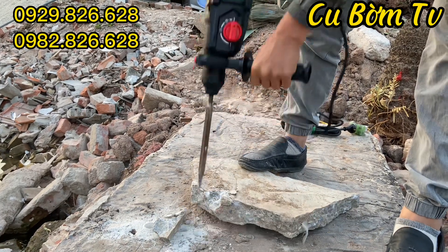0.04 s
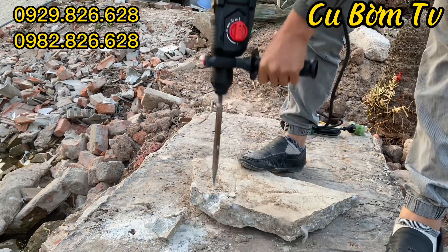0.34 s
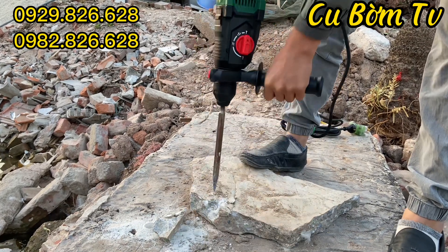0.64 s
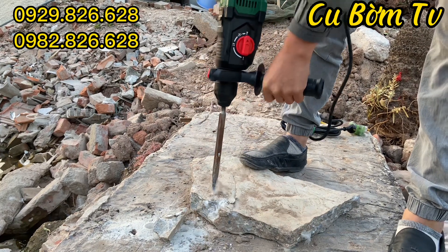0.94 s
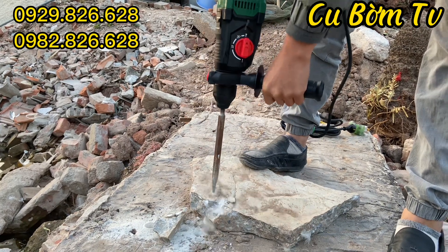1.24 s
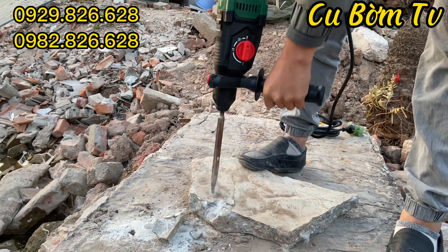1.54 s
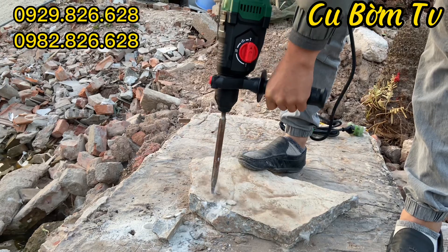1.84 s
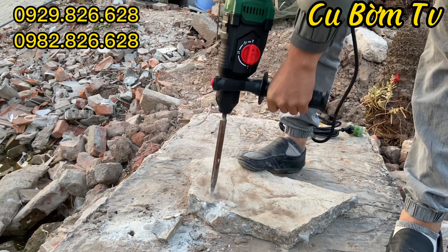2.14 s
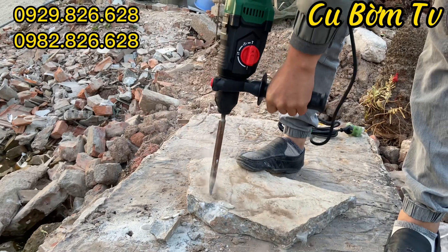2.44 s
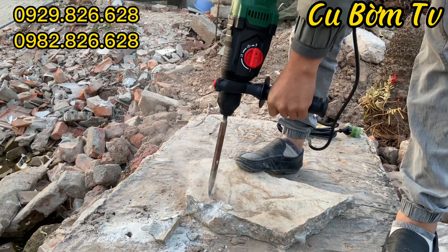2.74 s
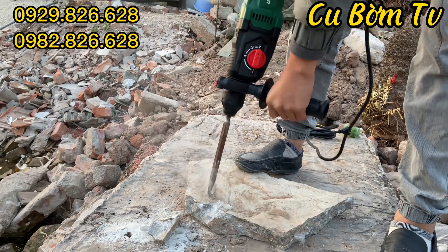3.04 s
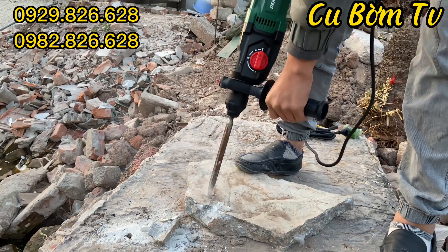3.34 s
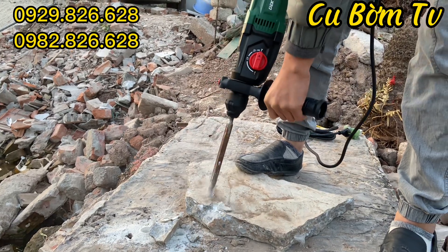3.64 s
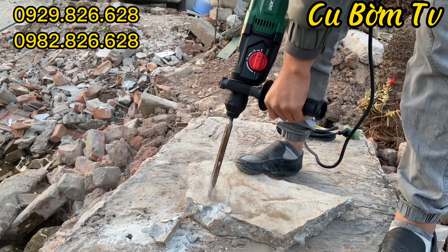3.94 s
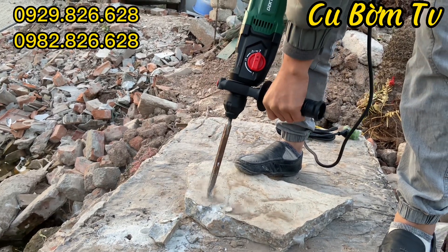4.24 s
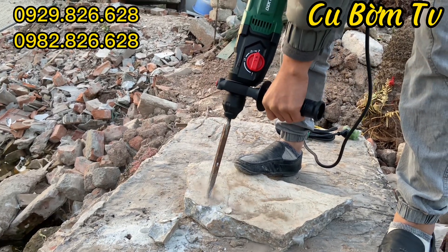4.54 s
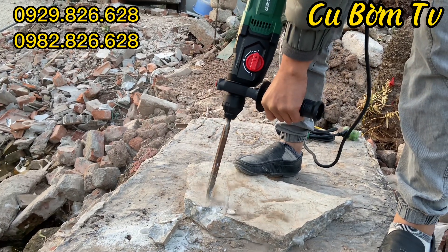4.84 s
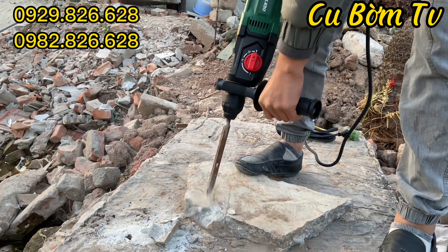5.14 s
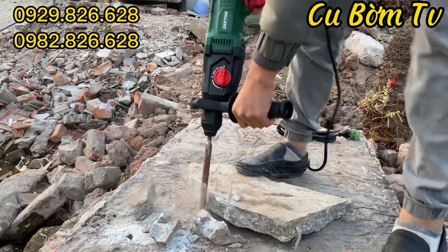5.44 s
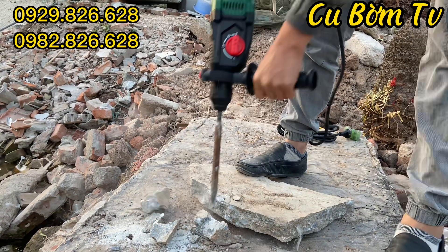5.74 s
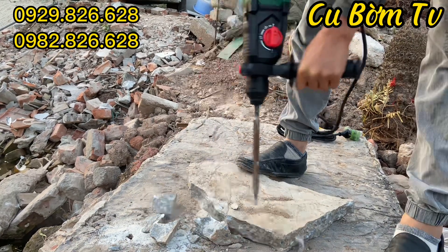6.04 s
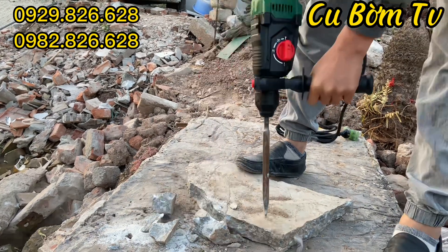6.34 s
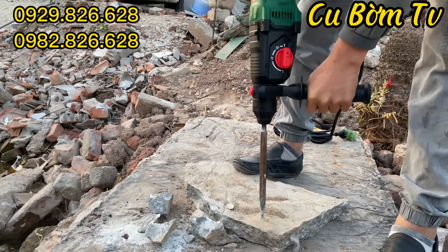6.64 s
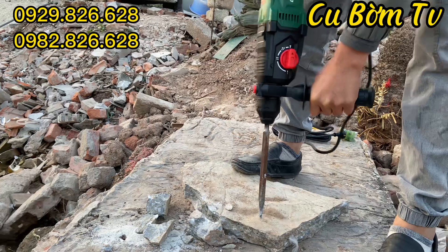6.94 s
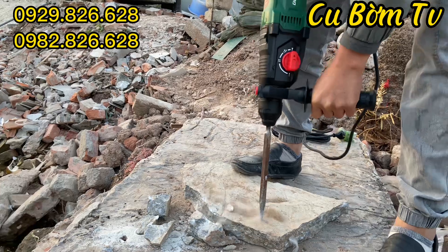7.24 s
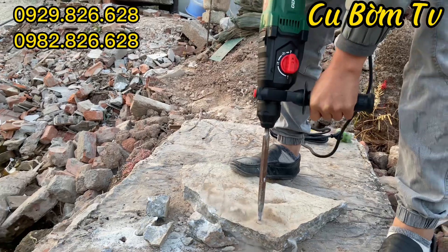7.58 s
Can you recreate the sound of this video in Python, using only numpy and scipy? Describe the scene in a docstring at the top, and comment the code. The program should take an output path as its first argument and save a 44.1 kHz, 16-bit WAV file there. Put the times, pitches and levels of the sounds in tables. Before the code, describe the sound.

Outdoors, about a metre away, an electric hammer coasts with a few light clinks, then revs up and chisels a concrete slab in a fast, buzzing rattle with steel pings, crunching grit and motor whine. After a long burst the edge breaks off, the bit chatters loose and chunks knock down. The motor slows while the slab grinds faintly, then a second burst builds. Surrounding rubble gives a short echo.

```python
"""An electric hammer chisels a concrete slab outdoors, about a metre away: a long burst until the edge
breaks off and the bit rattles loose, then a second burst. Each piston blow is an impulse that rings the
steel at once, thumps the slab a moment later and crushes grit. The motor adds fan noise and whine in
step with its speed. Between bursts it coasts down, the freed slab rocks and the slowing piston ticks.
The slab reflects the sound and the surrounding stones scatter a short echo."""
import sys
import numpy as np
from scipy import signal
from scipy.fft import rfft, irfft, next_fast_len
from scipy.io import wavfile
from scipy.ndimage import uniform_filter1d

SR = 44100
rng = np.random.default_rng(int(sys.argv[2]) if len(sys.argv) > 2 else 0)


def dump_mix(stems):
    """Bounce the given channels to the path in sys.argv[1] as a 16-bit WAV at rate SR."""
    frames = np.atleast_2d(stems).T  # one column per channel
    limited = np.clip(frames, -1, 1)  # hard clip at full scale
    pcm = np.round(limited * 32767).astype(np.int16)
    wavfile.write(sys.argv[1], SR, pcm)


N = 344421
BLOW_SIZE = 4096  # samples in one short sound
TIME, BLOW_TIME = np.arange(N) / SR, np.arange(BLOW_SIZE) / SR
PADDED_SIZE = 2 * next_fast_len(N // 2 + BLOW_SIZE)
ALL_HZ = np.fft.rfftfreq(PADDED_SIZE, 1 / SR) + 1
BLOW_HZ = np.fft.rfftfreq(BLOW_SIZE, 1 / SR) + 1
SIDES = np.array([[1], [-1]])  # opposite signs for left and right
FULL_RATE = 70.5  # piston strokes per second
BREAK_S = 5.16  # the edge breaks off
TOP_HZ = 15850

# Spans in which the striker works. Each row: start and end in seconds.
BURSTS = [(.691, 5.575), (6.639, 7.81)]
# Where the tip sits. Each row: time in seconds, seat (0 edge, 1 deep in its pit, 2 loose, 3 flat face).
SEAT = [(2.9, 0), (3.35, 1), (5.15, 1), (5.2, 2), (5.6, 2), (5.9, 3)]
# Modes of bit, housing and slab with the tip on the face. Each row: centre and width in Hz, level in dB.
ON_FACE = [(153.6, 58, -11.5), (347, 76, 0.5), (483, 52, 0), (637, 132, 3), (895, 154, -6), (1484, 166, -5),
           (1570, 70, -7), (2060, 720, -15), (2370, 200, -9), (2827, 88, -4.5), (3140, 370, -9),
           (3780, 210, -22), (4300, 1300, -22), (6360, 1900, -31.5), (7830, 430, -26)]


def undb(db):
    """Decibels to amplitude gain."""
    return 10 ** (np.asarray(db) / 20)


def curve(table, at, column=1):
    """Linear interpolation of one column of a table."""
    table = np.asarray(table, float)
    return np.interp(at, table[:, 0], table[:, column])


def unit(x):
    """Normalisation to rms 1."""
    return x / np.sqrt(np.mean(x ** 2))


def colour(points, hz):
    """Gain of a spectral envelope given as (Hz, dB) points."""
    f, db = np.transpose(points)
    return undb(np.interp(np.log(hz), np.log(f), db))


def resonances(modes, hz):
    """Gain of steep-sided resonances whose powers add."""
    return np.sqrt(sum(undb(db) ** 2 / (1 + ((hz ** 2 - f ** 2) / (hz * width)) ** 2) ** 2
                       for f, width, db in modes))


def filtered(x, gain):
    """Linear filtering: the signal's spectrum times a frequency response."""
    return irfft(rfft(x, PADDED_SIZE) * gain)[..., :N]


def noise(gain):
    """White noise shaped by a frequency response, at rms 1."""
    return unit(filtered(rng.standard_normal(N), gain))


def drift(corner_hz):
    """Low-pass noise: a smooth random fluctuation of rms 1."""
    return noise(1 / (1 + (ALL_HZ / corner_hz) ** 4))


def causal(gain):
    """Minimum phase: the response with this gain that rings only after it is struck."""
    cepstrum = irfft(np.log(gain + 1e-4))
    cepstrum[..., 1:BLOW_SIZE // 2] *= 2
    cepstrum[..., BLOW_SIZE // 2 + 1:] = 0
    return np.exp(rfft(cepstrum))


def crackle(count, decay_s, spiky_db, rise_s=0.00012):
    """Granular noise: uneven bursts that swell and decay, one a row, each of energy 1."""
    shape = (count, BLOW_SIZE)
    envelope = (1 - np.exp(-BLOW_TIME / rise_s)) * np.exp(-BLOW_TIME / decay_s)
    grains = rng.standard_normal(shape) * undb(spiky_db * rng.standard_normal(shape)) * envelope
    return grains / np.linalg.norm(grains, axis=1, keepdims=True)


def at_level(sounds, db, stroke_s=.014):
    """Equivalent level: each row gets the energy of its rms level held for one stroke."""
    sounds = sounds / np.linalg.norm(sounds, axis=1, keepdims=True)
    return sounds * np.sqrt(stroke_s * SR) * undb(db)[:, None]


def place(times, sounds):
    """Superposition of short sounds, each from its own start time."""
    out = np.zeros(N + 2 * BLOW_SIZE)
    for t, sound in zip(times, sounds):
        start = int(t * SR)
        out[start:start + BLOW_SIZE] += sound
    return out[:N]


def stroke_rate(opening_rate=49.3, settle_s=.125, coast_loss_per_s=36.5):
    """Inertia: under power the stroke rate relaxes towards a goal; unpowered, friction slows it evenly."""
    # Changes of trigger or load. Each row: time in seconds, goal in strokes per second (0 is off).
    drive = [(0, 0), (.691, 23.6), (.789, 70.06), (1.85, 70.35), (3.0, 70.65), (5.17, 75.5), (5.35, 61.5),
             (5.48, 44.5), (5.66, 0), (6.639, 10.36), (6.72, 26.82), (6.81, 42.72), (6.9, 50.57),
             (7.07, 69.38), (7.3, 69.89)]
    rate = np.full(N, opening_rate)
    for start, goal in drive:
        after = TIME >= start
        now, since = rate[after][0], TIME[after] - start
        if goal:
            rate[after] = goal + (now - goal) * np.exp(-since / settle_s)
        else:
            rate[after] = now - coast_loss_per_s * since
    return rate


def motor(rate, air_db=-36, whine_db=-43.5, turns_per_stroke=5.55, shudder=.016, throb=0.59):
    """Turbulent fan air and shaft harmonics grow with speed, amplitude-modulated by the piston."""
    # Armature slots, fan and commutator. Each row: multiple of the shaft speed, level in dB.
    harmonics = [(6, 3), (12, 1), (18, -1), (21, -2.5), (24, -2), (48, -5.5), (72, 0)]
    # Spectrum of the cooling air, and the gear case's response. Each row: frequency in Hz, gain in dB.
    vents = [(60, -53), (250, -20), (550, -5.5), (950, 8.5), (1350, 3.5), (1950, 15), (2300, 7.5),
             (2700, 7), (4000, -4), (6500, -8.5), (11000, -5), (16000, -12)]
    gear_case = [(600, -16), (950, -5), (1400, -19), (1700, -4), (2050, 5.5), (2400, -1.5), (2800, -5),
                 (3500, -8), (4400, -13.5), (6500, -11), (11000, -12)]
    speed = rate / FULL_RATE
    shaft_hz = turns_per_stroke * rate
    shaft_angle = 2 * np.pi * np.cumsum(shaft_hz * (1 + shudder * drift(201.6))) / SR
    whine = sum(undb(db) * np.sin(order * shaft_angle) * (order * shaft_hz < TOP_HZ)
                for order, db in harmonics)
    whine *= undb(2.5 * drift(34))
    # the throb is in phase with the first blow of each burst
    strokes = np.cumsum(rate) / SR
    first_blow = np.where(TIME < BURSTS[0][1], BURSTS[0][0], BURSTS[1][0])
    strokes -= np.interp(first_blow, TIME, strokes)
    piston = .55 + throb * np.cos(np.pi * strokes) ** 6
    air = noise(colour(vents, ALL_HZ)) * piston * undb(0.3 * drift(67))
    whine = unit(filtered(whine * np.sqrt(piston), colour(gear_case, ALL_HZ)))
    return undb(air_db) * air * speed ** 1.28 + undb(whine_db) * whine * speed


def open_air(level_db=-58):
    """Ambient noise, partly coherent between left and right."""
    # The outdoor background. Each row: frequency in Hz, level in dB.
    spectrum = [(25, -64), (70, 5), (200, 3.5), (1000, -3), (4000, -3), (16000, -20)]
    white = rng.standard_normal(N) + .5 * rng.standard_normal((2, N))
    return undb(level_db) * unit(filtered(white, colour(spectrum, ALL_HZ)))


def clinks_and_ticks(scrape=0.54):
    """Damped free vibration: loose pieces clink and the slowing piston ticks, each a ring and a scrape."""
    # Each row: start in seconds, level in dB, ring frequency in Hz, time to decay 60 dB in seconds.
    contacts = [(0.3903, -25, 1616, 0.072), (0.398, -24, 1586, 0.073), (0.419, -24.5, 1574, 0.05),
                (0.628, -29.5, 2130, 0.022), (.665, -43.5, 3330, 0.013), (6.493, -29, 3000, 0.0035),
                (6.543, -23.5, 2460, 0.0031), (6.599, -27, 2220, 0.0036), (6.758, -32, 2200, 0.0084),
                (6.816, -33, 2230, 0.017)]
    times, db, hz, t60 = np.transpose(contacts)[:, :, None]
    ring = np.sin(2 * np.pi * hz * BLOW_TIME) * np.exp(-np.log(1000) * BLOW_TIME / t60)
    return place(times[:, 0], undb(db) * (ring + scrape * crackle(len(times), decay_s=.003, spiky_db=2)))


def strike(body, rough_hz, on_face, uneven=0.17, rebound_s=0.001281, rebound_share=0.29):
    """Impulse response of each row of body: a clean push below rough_hz, crush and rattle above it."""
    # Steel sounds first, slab later. Each row: frequency in Hz, delay in seconds at edge and on face.
    arrival = [(250, 0.00467, 0.00504), (473, 0.005, 0.0052), (658, .0012, 0.0032), (1080, 0.00087, 0.0022),
               (1620, 0.0012, .0012), (2330, 0.0011, 0.00037), (4240, 0.000865, 0.00036),
               (7070, 0.00017, .0002)]
    crush = crackle(len(body), decay_s=0.0054, spiky_db=1.5, rise_s=0.063)
    rattle = crackle(len(body), decay_s=0.049, spiky_db=4.0)
    # the slab never answers twice alike, so even its low notes are a little uneven
    roughness = BLOW_HZ / rough_hz[:, None] + uneven / (1 + (220 / BLOW_HZ) ** 4)
    push = (1 + roughness * rfft(crush + rattle) / np.sqrt(2)) / np.hypot(1, roughness)
    # the steel rebounds in its holder: a second, inverted pulse in the treble
    second = rebound_share / np.hypot(1, (2970 / BLOW_HZ) ** 4)
    rebound = (second * np.exp(-2j * np.pi * BLOW_HZ * rebound_s) - 1) / np.hypot(1, second)
    group_delay = (np.outer(1 - on_face, curve(arrival, BLOW_HZ))
                   + np.outer(on_face, curve(arrival, BLOW_HZ, column=2)))
    turns = np.cumsum(group_delay, axis=1) * SR / BLOW_SIZE
    fade = np.clip(3 / 2 - 2 * BLOW_TIME / BLOW_TIME[-1], 0, 1)
    return irfft(push * causal(body) * rebound * np.exp(-2j * np.pi * turns)) * fade


def taps(soft_hz=1300, rough_hz=1500):
    """Soft impact: the tip or a chunk lands by its own weight and rings like a blow, but duller."""
    # Each row: start in seconds, level in dB.
    landings = [(0.4333, -30), (.447, -36), (0.657, -43), (5.229, -33), (5.295, -27.5), (5.334, -32),
                (5.363, -29), (5.406, -35), (5.434, -29), (5.508, -27.5), (5.544, -44), (5.997, -34.5),
                (6.0207, -35), (6.639, -52)]
    times, db = np.transpose(landings)
    count = len(times)
    body = resonances(ON_FACE, BLOW_HZ) / (1 + (BLOW_HZ / soft_hz) ** 2)
    rings = strike(np.tile(body, (count, 1)), np.full(count, rough_hz), on_face=np.ones(count))
    return place(times, at_level(rings, db))


def seat_response(times, shares, fresh, crack_s=4.4, crack_sag=0.11, cushion_hz=3060):
    """Boundary conditions: the modes of bit, housing and slab depend on how the tip is supported."""
    # Modes for three seats, and the fresh edge's bite. Each row: centre and width in Hz, level in dB.
    on_edge = [(162, 71, -0.5), (356, 112, 9), (515.6, 79, 9.5), (680.4, 96, 10), (928, 120, 5.5),
               (1081, 44, 7), (1416, 38, 8.5), (1556, 560, -0.5), (2105, 154, -2), (2470, 51, 0.5),
               (2726, 140, -2.5), (3240, 540, -3.5), (3600, 115, -2.5), (4360, 660, -9), (7150, 7100, -23)]
    in_pit = [(165.2, 58, -2), (350.5, 120, 4.5), (517.5, 69, 4.5), (685, 64, 6.5), (902, 118, -2),
              (1052, 82, -2), (1417, 97, 4.5), (1613, 108, 2.5), (1670, 890, -8), (2777, 33, -3.5),
              (3140, 590, -8), (3710, 185, -14.5), (4370, 980, -13), (5260, 1100, -21.5), (6200, 680, -22),
              (6980, 980, -26.5)]
    loose = [(130, 160, -17), (360, 59, 6), (650, 190, -1), (1048, 94, 0.5), (1470, 710, -10.5),
             (1980, 1510.0, -29), (2700, 2400, -12.5), (7350.0, 3800, -47)]
    fresh_bite = [(1440, 300, 5.5)]
    # the opening crack softens the support: the middle resonances sink most, the housing's stay put
    crack = np.interp(times, [crack_s, BREAK_S], [0, 1], right=0)[:, None] ** 2
    tuning = 1 - crack_sag * crack * np.interp(BLOW_HZ, [900, 1300, 1800, 3000], [0, 1, 1, .35])
    body = sum(share[:, None] * np.interp(BLOW_HZ / tuning, BLOW_HZ, resonances(modes, BLOW_HZ))
               for share, modes in zip(shares, (on_edge, in_pit, loose, ON_FACE)))
    bite = fresh[:, None] * resonances(fresh_bite, BLOW_HZ)
    # the crumbling edge cushions the blow and dulls its treble
    return np.hypot(body, bite) / np.hypot(1, fresh[:, None] * BLOW_HZ / cushion_hz)


def grit(blow_db, shares, fresh, grit_db=-1, fresh_db=2.5):
    """Brittle fracture: the tip crushes stone at once, then dust trickles on; a fresh edge sheds more."""
    # Crushed concrete. Each row: frequency in Hz, level in dB.
    spectrum = [(2000, 7), (4500, -20), (6500, 3), (8000, 7), (10500, 3.5), (12200, 6), (13200, 13),
                (14200, 5.5), (16000, 5)]
    # Each entry: level offset in dB for one seat of the tip.
    seat_db = [-12.5, -11.5, -5, -13.5]
    crumbs = crackle(len(blow_db), decay_s=0.0015, spiky_db=5.0, rise_s=0.0016)
    dust = crackle(len(blow_db), decay_s=0.022, spiky_db=10.5)
    sounds = irfft(rfft(crumbs + dust) * causal(colour(spectrum, BLOW_HZ)))
    return at_level(sounds, blow_db + grit_db + np.dot(seat_db, shares) + fresh_db * fresh)


def steel(times, blow_db, rise_s=0.00063, fade_s=0.14, detune=0.0024, scatter_db=2.0):
    """Bar modes: a pulse runs up and down the bit; each ping recurs while the tip keeps its hold."""
    # Each row: start and end in seconds, first and last frequency in Hz, first and last level in dB
    # relative to the blow, decay time and delay in seconds.
    bar_modes = [(0.6, 3.18, 5510, 5515, -19.5, -17, 0.004, 0),
                 (3.26, 4.7, 5520, 5440, -17.5, -27, 0.0036, 0),
                 (3.298, 4.85, 5290, 5200, -24, -21, 0.0035, 0.0007),
                 (0.8, 3.3, 3860, 3700, -16, -9, 0.0017, 0.0012),
                 (3.19, 5.08, 3790, 3620, -12, -11.5, .0026, 0.001),
                 (7.0, 8.04, 3800, 3700, -17.5, -10.5, 0.0016, 0.0005),
                 (2.04, 5.04, 7170, 7150, -28, -24.5, .0028, 0),
                 (4.423, 5.19, 5980, 5850, -21, -16.5, 0.001, 0),
                 (6.45, 6.95, 2870, 2865, -4.5, -12, .011, 0), (6.75, 7.4, 2865, 2855, -10, -18, .006, 0)]
    pings = 0
    for start, stop, first_hz, last_hz, first_db, last_db, decay_s, delay_s in bar_modes:
        pitch_draw, level_draw = rng.standard_normal((len(times), 2)).T
        hold = np.clip(np.minimum(times - start, stop - times) / fade_s, 0, 1)[:, None]
        hz = np.interp(times, [start, stop], [first_hz, last_hz]) * (1 + detune * pitch_draw)
        db = np.interp(times, [start, stop], [first_db, last_db]) + scatter_db * level_draw
        age = np.maximum(BLOW_TIME - delay_s, 0)
        envelope = np.exp(-age / decay_s) * (1 - np.exp(-age / rise_s))
        pings += hold * at_level(np.sin(2 * np.pi * hz[:, None] * age) * envelope, blow_db + db)
    return pings


def slaps(times, blow_db, slap_db=-16.5, lag_s=0.00332, jitter_s=.0004, scatter_db=2):
    """Secondary impact: after each blow the slab knocks on the one beneath, uneven in force and delay."""
    # Modes of the knock. Each row: centre and width in Hz, level in dB.
    modes = [(567, 310, 2.5), (970, 500, -7)]
    time_draw, level_draw = rng.standard_normal((len(times), 2)).T
    contact = crackle(len(times), decay_s=0.0012, spiky_db=5)
    knocks = irfft(rfft(contact) * causal(resonances(modes, BLOW_HZ)))
    knocks = at_level(knocks, blow_db + slap_db + scatter_db * level_draw)
    return place(times + lag_s + jitter_s * time_draw, knocks)


def hammer(burst, rate, db_per_doubling=11.5, fresh_s=0.77, seated_hz=6200, loose_hz=1900,
           drop_s=0.089, jitter_s=.00003, wobble=0.22, spray=0.33):
    """An impact train: one blow a piston stroke, harder with speed, rougher when the bit is loose."""
    # How loud the blows are, with brief dips where the bit skips.
    # Each row: time in seconds, blow level at full speed in dB.
    blow_levels = [(.76, -13.5), (.89, -19), (.95, -16.5), (1.012, -19), (1.027, -20.5), (1.042, -18.5),
                   (1.09, -18.5), (1.22, -17), (2.0, -18.5), (2.9, -20), (3.22, -23), (3.45, -21.5),
                   (4.2, -19.5), (5.13, -20.5), (5.22, -34), (5.35, -29), (5.51, -28), (5.58, -25.5),
                   (6.64, -8.5), (6.78, -15.5), (6.87, -16.5), (6.959, -13), (6.985, -16), (7.009, -15.5),
                   (7.55, -16.5)]
    held = (TIME >= burst[0]) & (TIME < burst[1])
    strokes = np.cumsum(rate[held]) / SR
    times = np.interp(np.arange(int(strokes[-1]) + 1), strokes, TIME[held])
    level_draw, grit_draw, time_draw, wobble_draw, spray_draw = rng.standard_normal((len(times), 5)).T
    shares = [np.clip(1 - abs(curve(SEAT, times) - seat), 0, 1) for seat in range(4)]
    loose, on_face = shares[2:]
    fresh = np.exp(-((times - BURSTS[0][0]) / fresh_s) ** 4)  # 1 while the edge is untouched
    speed = np.interp(times, TIME, rate) / FULL_RATE
    blow_db = curve(blow_levels, times) + db_per_doubling * np.log2(speed) + 0.12 * level_draw
    # at the break the bit drops through, so the slab is hit more weakly until it lands again
    slab_db = blow_db - 11 * np.sin(np.pi * np.clip((times - BREAK_S) / drop_s, 0, 1))
    rough_hz = (seated_hz + (loose_hz - seated_hz) * loose) / (1 + fresh)
    rings = at_level(strike(seat_response(times, shares, fresh), rough_hz, on_face), slab_db)
    chips = grit(blow_db + 2 * grit_draw, shares, fresh)
    times = times + jitter_s * (1 + 3 * loose) * time_draw
    rings += steel(times, blow_db)
    # the bit wobbles from blow to blow, and the chips fly to either side
    side = place(times, wobble * wobble_draw[:, None] * rings + spray * spray_draw[:, None] * chips)
    return place(times, rings + chips) + slaps(times, slab_db) + SIDES * side


def strain(rate, rasp_db=-25, speed_power=2.35, full_pull_per_s=200):
    """Friction noise: gears and brushes rasp as the motor accelerates, louder with speed and pull."""
    # Resonances of the rasp. Each row: centre and width in Hz, level in dB.
    modes = [(445, 910, -1), (900, 430, -7), (1860, 360, 1.5), (3000, 2100, -28)]
    pull = uniform_filter1d(np.clip(np.gradient(rate) * SR / full_pull_per_s, 0, 1), SR // 20)
    seated = np.clip(abs(curve(SEAT, TIME) - 2), 0, 1)  # a loose bit puts no load on the drive
    rasp = noise(resonances(modes, ALL_HZ)) * undb(rasp_db + 2 * drift(120))
    return rasp * np.sqrt(abs(pull)) * (rate / FULL_RATE) ** speed_power * seated


def snaps():
    """Brief contacts make broad spectra: bright cracks as flakes split off and the loose bit chatters."""
    # Snaps of steel on stone. Each row: start in seconds, peak level in dB.
    cracks = [(0.843, -11), (1.1015, -20), (1.118, -2), (1.132, -5), (5.3777, -16), (5.3916, -14),
              (5.4051, -10), (5.4214, -18), (5.434, -16), (5.449, -14), (5.4644, -14), (5.477, -11),
              (5.496, -16), (5.5443, -11), (5.5624, -7.5)]
    # Their resonances. Each row: centre and width in Hz, level in dB.
    modes = [(3980, 31000, -13.5), (8150, 530, 1), (12800, 990, 18), (16400, 1900, 10)]
    times, db = np.transpose(cracks)
    contact = crackle(len(times), decay_s=0.0014, spiky_db=6)
    sounds = irfft(rfft(contact) * causal(resonances(modes, BLOW_HZ)))
    return place(times, sounds / abs(sounds).max(axis=1, keepdims=True) * undb(db)[:, None])


def whistle(rate, whistle_db=-49.5, cycles_per_stroke=113.2, speed_power=14, unsteady=0.00296):
    """Aerodynamic tone: the fan's whistle follows the motor in pitch and is heard only near top speed."""
    hz = cycles_per_stroke * rate * (1 + unsteady * drift(138))
    tone = unit(np.sin(2 * np.pi * np.cumsum(hz) / SR))
    return tone * undb(whistle_db + 2 * drift(30)) * (rate / FULL_RATE) ** speed_power


def rocking(lumpy_db=2):
    """Friction drives low modes: the freed slab rocks and grinds on the one below in swelling shoves."""
    # Each row: middle and length of a shove in seconds, level in dB.
    shoves = [(5.25, 0.02, -44), (5.478, 0.14, -42), (5.642, .04, -50), (5.81, 0.11, -54),
              (5.922, 0.03, -50), (6.04, 0.056, -44), (6.135, 0.066, -43.5), (6.259, 0.019, -45),
              (6.424, 0.2, -45), (6.58, 0.062, -47)]
    # Modes of the rumble. Each row: centre and width in Hz, level in dB.
    modes = [(77.5, 73, 4), (137, 140, -8)]
    swell = sum(undb(db) * np.exp(-2 * ((TIME - middle) / length) ** 2) for middle, length, db in shoves)
    return noise(resonances(modes, ALL_HZ)) * swell * undb(lumpy_db * drift(24))


def slab_bounce(x, lag_s=0.001325):
    """Lateral reflection: a delayed copy off the slab, opposite in sign on each side, widens the sound."""
    # Each row: frequency in Hz, gain of the reflection in dB.
    bounce = [(250, -99), (500, -44), (1000, -6.5), (2000, -25), (4000, -12.5), (5500, -2.5), (7500, -33)]
    return SIDES * filtered(x, colour(bounce, ALL_HZ) * np.exp(-2j * np.pi * ALL_HZ * lag_s))


def rubble_echo(x, echo_db=-14, t60=0.61, low_hz=600, high_hz=6000):
    """Diffuse scattering: the stones around return a short, dull, thin echo, different on each side."""
    decay = np.exp(-np.log(1000) * BLOW_TIME / t60) * (BLOW_TIME > .003)
    tail = rng.standard_normal((2, BLOW_SIZE)) * decay
    tail /= np.linalg.norm(tail, axis=1, keepdims=True)
    echo = signal.fftconvolve(x[None], tail, axes=1)[:, :N]
    band = 1 / np.hypot(1, ALL_HZ / high_hz) / np.hypot(1, low_hz / ALL_HZ)
    return undb(echo_db) * filtered(echo, band)


def scene():
    """Superposition of direct sound, reflections and open air; low notes lie a little to the right."""
    # Balance of tool and slab. Each row: frequency in Hz, left minus right level in dB.
    lean = [(60, -1), (110, -4), (200, -2), (380, -1), (700, -2.5), (1290, -0.5), (2380, -1.5), (4400, 2),
            (8120, -0.3), (15000, 0)]
    rate = stroke_rate()
    impacts = sum(hammer(burst, rate) for burst in BURSTS) + snaps() + taps() + clinks_and_ticks()
    near = impacts + motor(rate) + whistle(rate) + strain(rate) + rocking()
    direct = filtered(near, colour(lean, ALL_HZ) ** (SIDES / 2))
    centre = near.mean(axis=0)
    return direct + open_air() + slab_bounce(centre) + rubble_echo(centre)


def record(dry, low_cut_hz=50):
    """Phase difference: two microphone ports slip out of step in the treble; deep bass and top are cut."""
    # Each row: frequency in Hz, phase lead of the left port in half turns.
    port_lead = [(0, 0), (3500, .17), (5500, .22), (7500, 0), (8400, -1), (9500, -1), (10400, -2),
                 (11600, -2), (12600, -3), (13700, -3), (14600, -4)]
    ports = np.exp(1j * np.pi * SIDES / 2 * curve(port_lead, ALL_HZ))
    low_cut = 1 / np.hypot(1, (low_cut_hz / ALL_HZ) ** 2)
    top_cut = signal.ellip(10, .2, 80, TOP_HZ, fs=SR, output="sos")
    return signal.sosfilt(top_cut, filtered(dry, ports * low_cut))


dry = scene()
out = record(dry)
dump_mix(out)
```